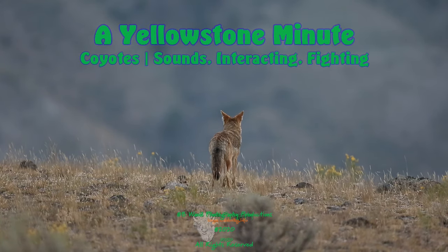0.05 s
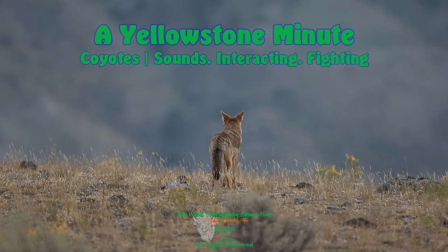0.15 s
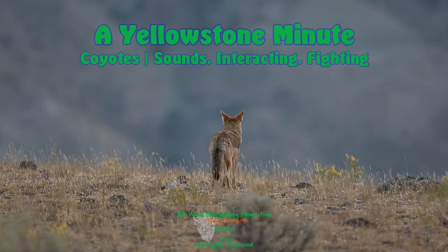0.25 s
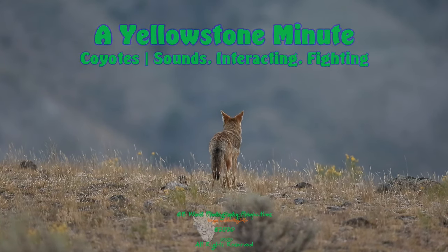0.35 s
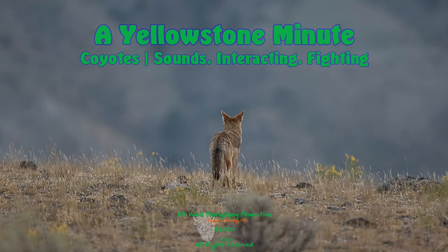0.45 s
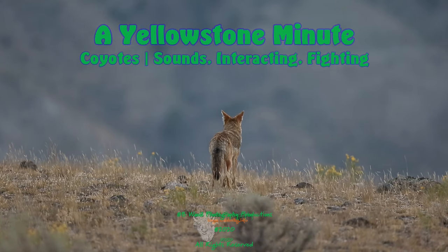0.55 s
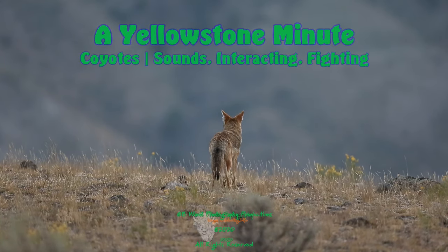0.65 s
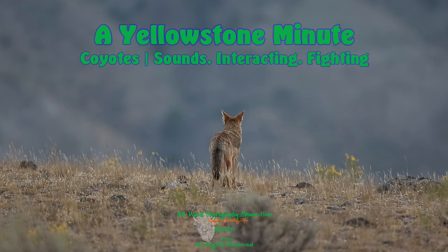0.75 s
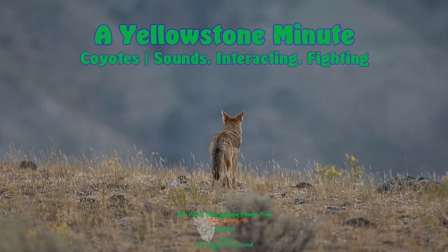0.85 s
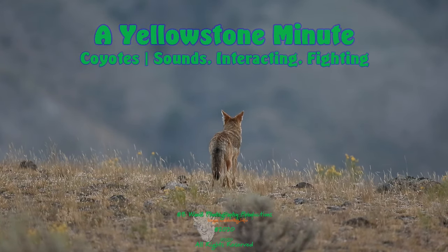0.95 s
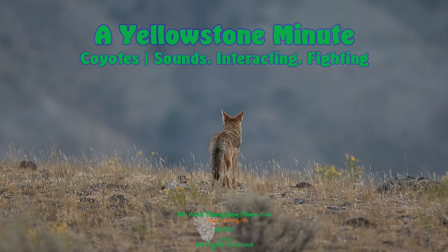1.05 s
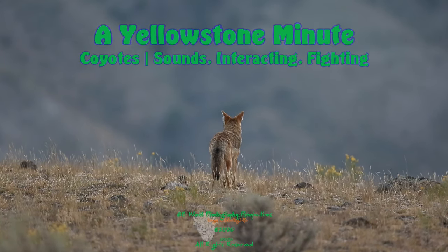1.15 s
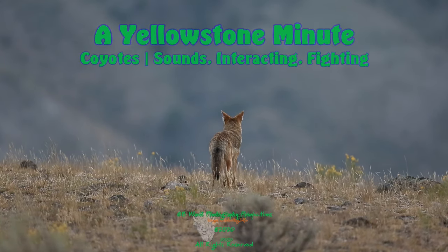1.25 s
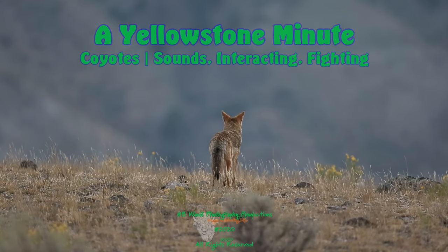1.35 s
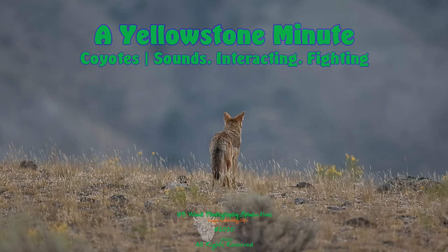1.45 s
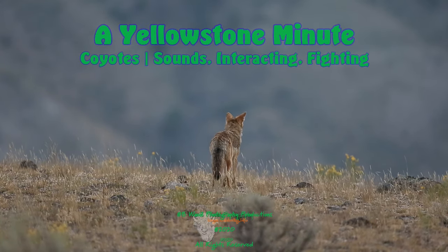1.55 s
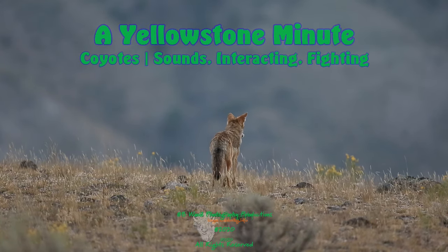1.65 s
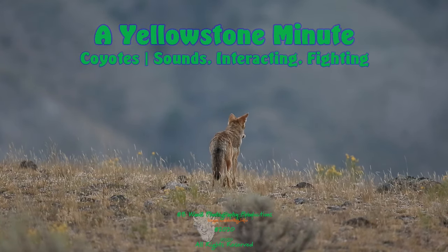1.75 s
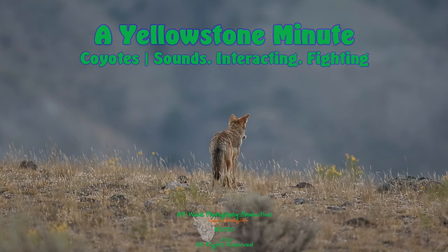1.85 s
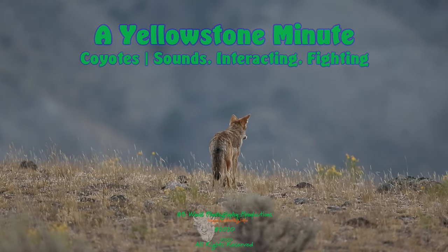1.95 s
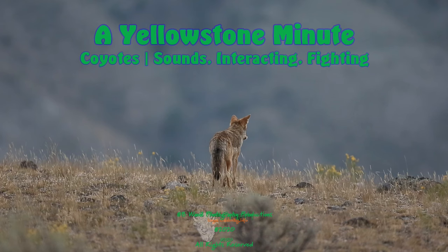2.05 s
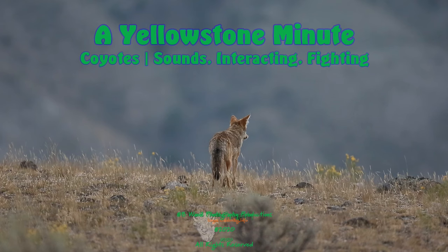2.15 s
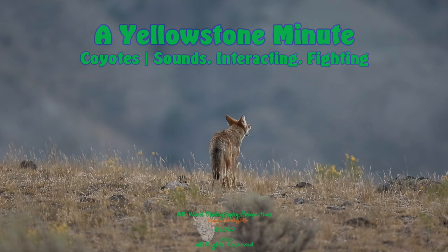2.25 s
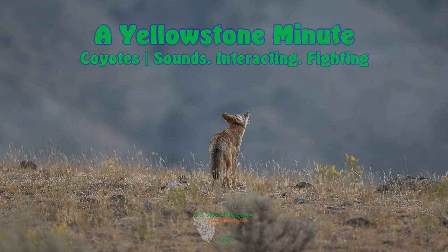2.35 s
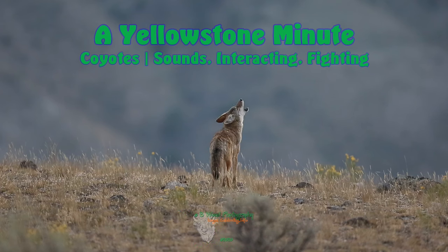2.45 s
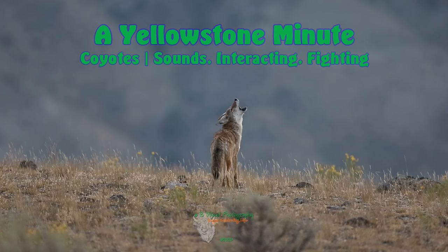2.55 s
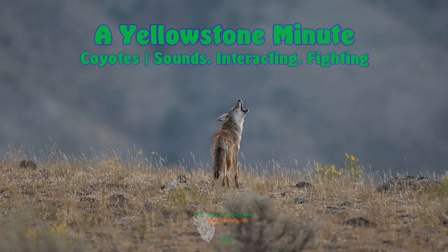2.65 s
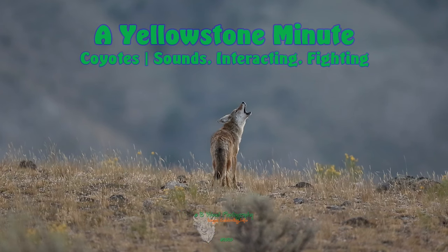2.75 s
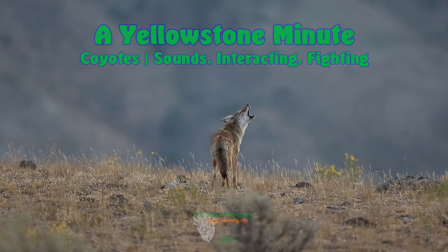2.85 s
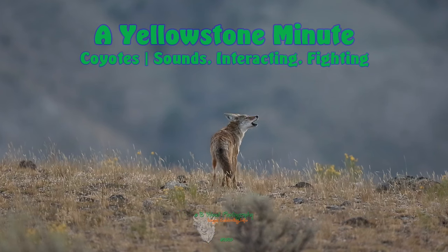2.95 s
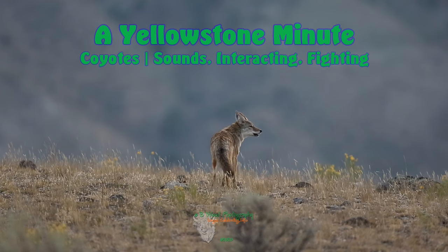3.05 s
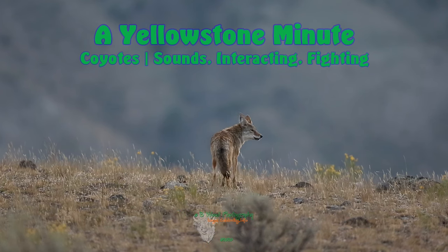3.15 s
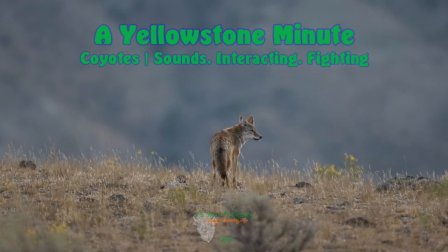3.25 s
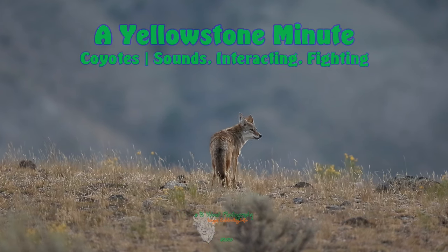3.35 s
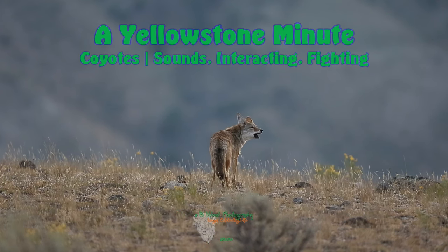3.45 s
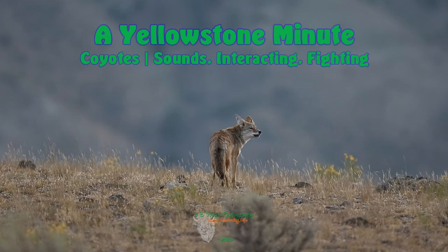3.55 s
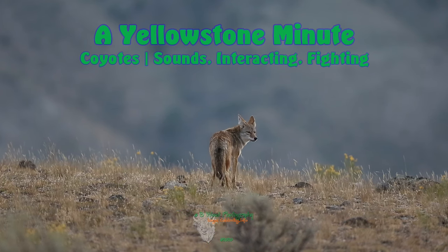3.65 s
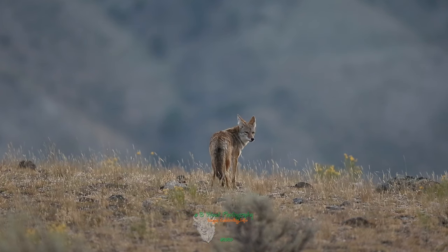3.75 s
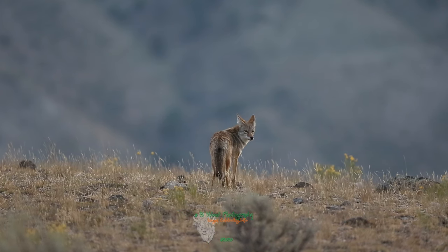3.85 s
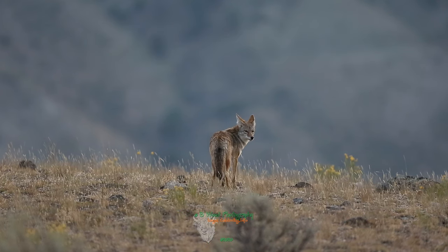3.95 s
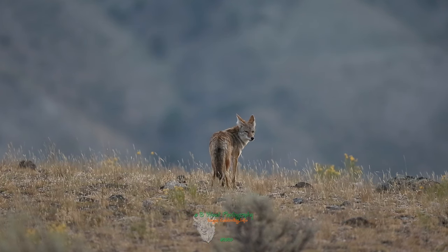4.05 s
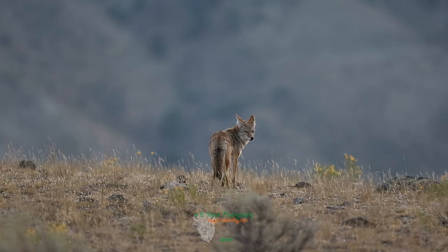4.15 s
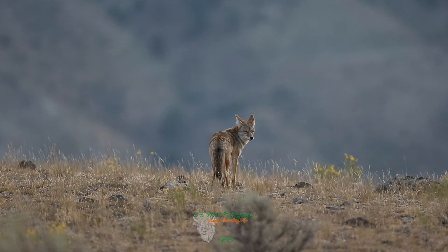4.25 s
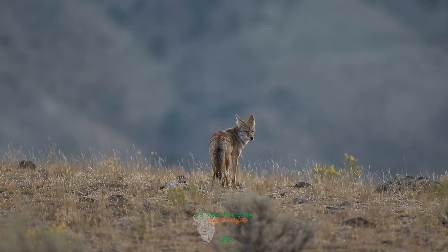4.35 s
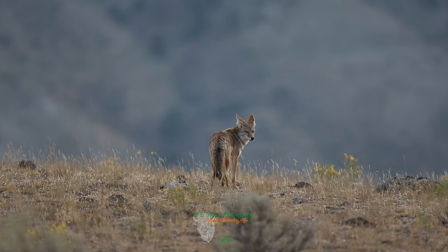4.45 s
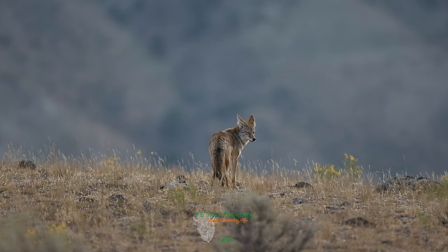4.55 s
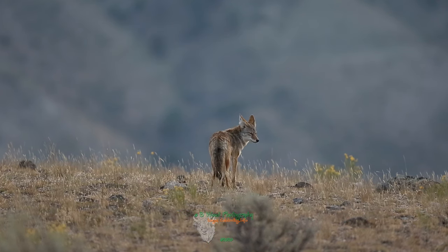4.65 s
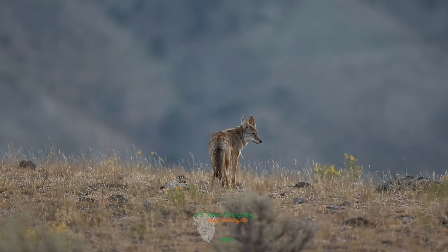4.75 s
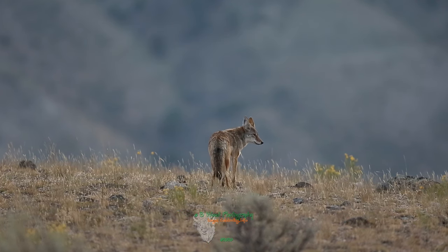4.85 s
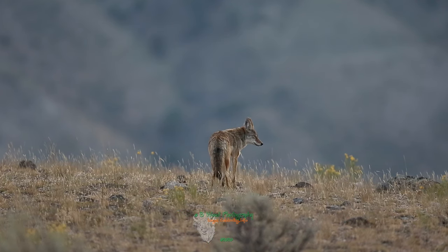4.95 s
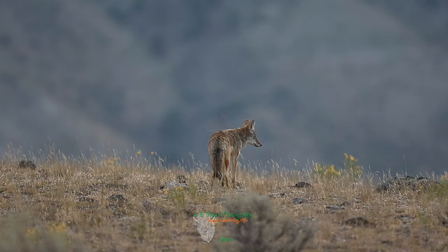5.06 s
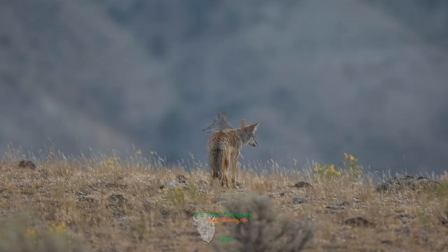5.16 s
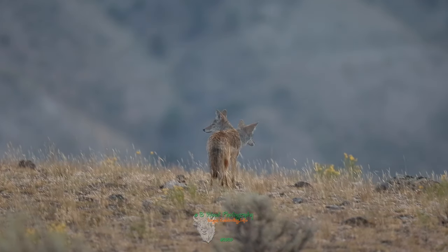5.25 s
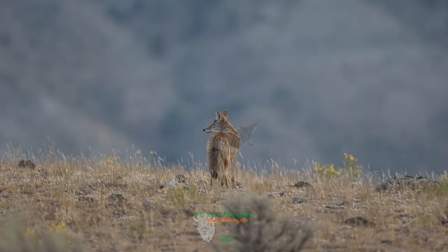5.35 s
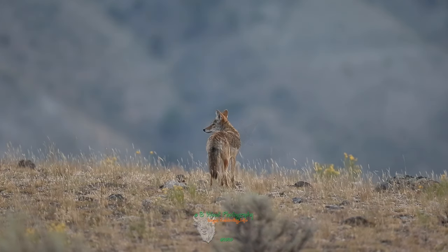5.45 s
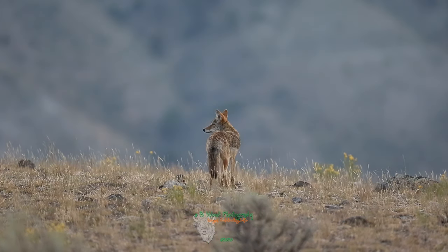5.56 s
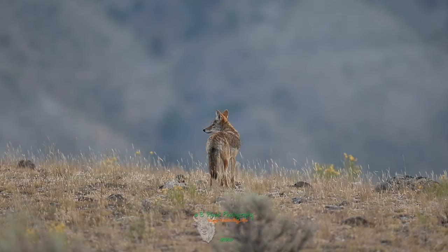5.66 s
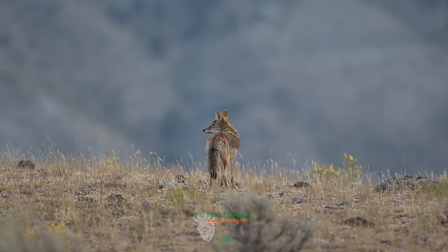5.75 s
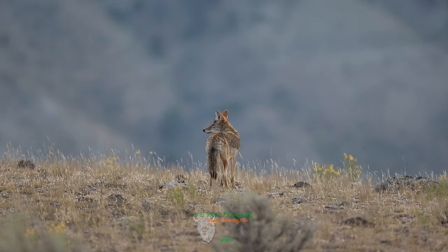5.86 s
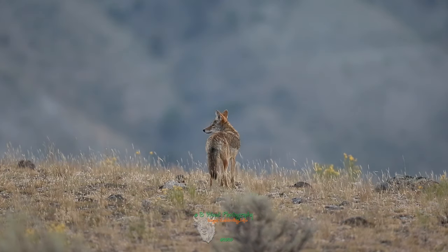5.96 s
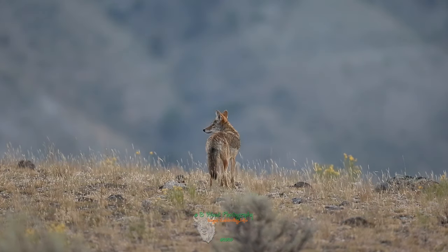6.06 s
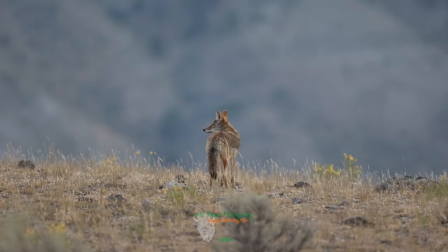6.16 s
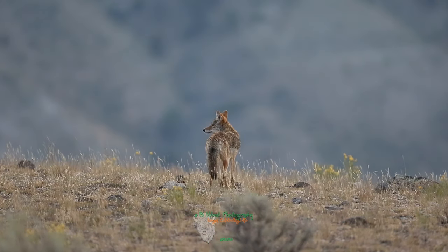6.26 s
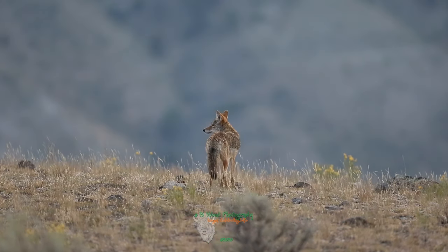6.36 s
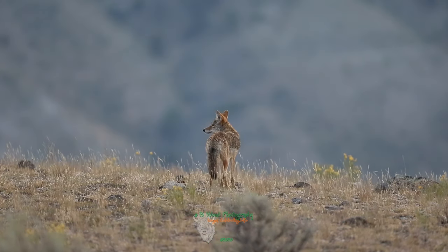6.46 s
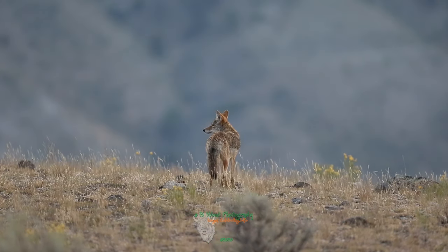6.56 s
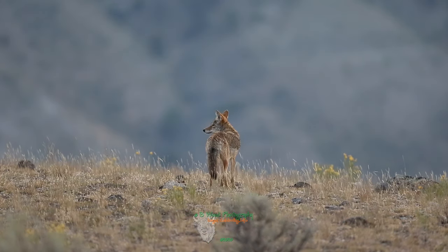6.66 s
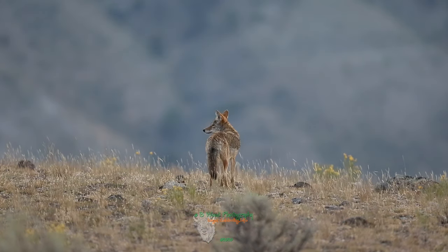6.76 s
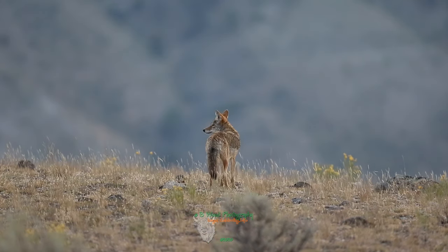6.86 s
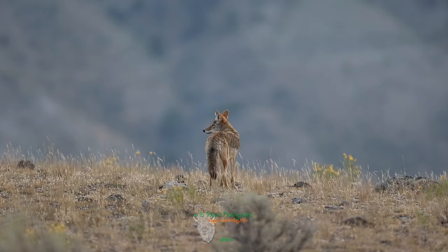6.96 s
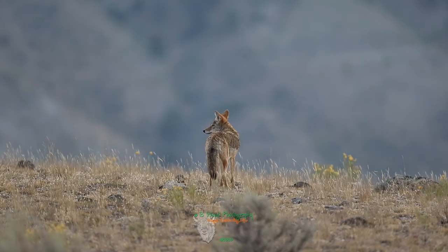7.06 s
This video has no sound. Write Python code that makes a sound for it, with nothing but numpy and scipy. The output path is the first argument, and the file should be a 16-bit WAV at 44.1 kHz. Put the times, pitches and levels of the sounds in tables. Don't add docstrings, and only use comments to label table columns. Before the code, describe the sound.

A coyote yips, howls once high and wavering, then barks on an open hillside, amid constant raspy bird squawks and a few fluttering croaks.

```python
import sys
import numpy as np
from scipy import signal
from scipy.fft import rfft, irfft, next_fast_len
from scipy.io import wavfile
from scipy.ndimage import uniform_filter1d

SR = 44100
rng = np.random.default_rng(int(sys.argv[2]) if len(sys.argv) > 2 else 0)


def volts(x):
    e = np.asarray(x, float) / 20
    return 10 ** e


def transcribe(u):
    v = np.clip(np.atleast_2d(u).T, -1, 1)
    q = np.round(v * 32767).astype(np.int16)
    wavfile.write(sys.argv[1], SR, q)


N = 313110


def evened(x):
    return x / np.sqrt(np.mean(x ** 2) + 1e-20)


def read(points, hz):
    f, value = np.transpose(points)
    return np.interp(np.log(hz + 1), np.log(f + 1), value)


def add(mix, s, sound):
    part = mix[round(s * SR):][:len(sound)]
    part += sound[:len(part)]


def coloured(x, points):
    size = next_fast_len(len(x) + 1024)
    gain = volts(read(points, np.fft.rfftfreq(size, 1 / SR)))
    return evened(irfft(rfft(x, size) * gain, size)[:len(x)])


def air():
    # hz, level_db (per Hz)
    air_spectrum = [(20, -29), (70, -9), (140, -8), (260, -2), (800, -2.5), (1500, -8.5), (3000, -11.5),
                    (6000, -14.5), (10000, -16), (15000, -14.5)]
    # start_s, level_db, length_s
    wind_puffs = [(.0, -76, .06), (0.319, -57.5, 0.063), (0.383, -64, 0.11), (1.75, -72, 0.13),
                  (5.007, -64, 0.06), (5.898, -73, 0.12), (6.816, -67, 0.067)]
    puff_spectrum = [(15, -13), (55, -12), (110, -10.5), (200, -38.5)]  # hz, level_db
    wash_db = -58
    cricket_hz, cricket_width_hz, cricket_db = 7980, 71, -79.5

    frames, hz = N // 256 + 5, np.fft.rfftfreq(1024, 1 / SR)
    real, imaginary, patches = rng.standard_normal((frames, 513, 3)).T
    patches = uniform_filter1d(patches, size=10, axis=0)
    patches = evened(uniform_filter1d(patches, size=16, axis=1))
    cells = (real + 1j * imaginary) * volts(read(air_spectrum, hz)[:, None] + 2.0 * patches)
    wash = signal.istft(cells, nperseg=1024, noverlap=768)[1][:N]
    wash = volts(wash_db - 3.0) * evened(wash)
    for s, level_db, length in wind_puffs:
        size = round(length * SR)
        puff = np.hanning(size) * coloured(rng.standard_normal(size), puff_spectrum)
        add(wash, s, volts(level_db) * puff)
    low_hz, high_hz = cricket_hz - cricket_width_hz, cricket_hz + cricket_width_hz
    line = coloured(rng.standard_normal(N), [(low_hz, -40), (cricket_hz, 0), (high_hz, -40)])
    return wash + volts(cricket_db) * line


def valley(x, t60=1.0, first_s=0.1, slope_s=0.43, slope_db=6, dull_hz=1900):
    t = np.arange(SR) / SR
    taps = rng.standard_normal(SR) * (rng.random(SR) < .05) * (t > first_s)
    answer_db = slope_db * np.exp(-((t - slope_s) / 0.055) ** 2)
    tail = taps * volts(-60 * t / t60 + answer_db)
    dull = signal.lfilter(*signal.butter(2, dull_hz, fs=SR), x)
    return signal.fftconvolve(dull, tail / np.linalg.norm(tail))[:N]


def coo(s, level_db, length, hz):
    size = round(length * SR)
    fuzz = coloured(rng.standard_normal(size), [(0.63 * hz, -30), (hz, 0), (1.7 * hz, -30)])
    return s, volts(level_db) * signal.windows.tukey(size, .6) * fuzz


def far_coos(mix):
    # start_s, level_db, length_s, pitch_hz
    coos = [(1.704, -64.5, 0.19, 292), (2.1, -76, .2, 524), (4.598, -69.5, 0.167, 810),
            (5.886, -50.5, 0.051, 460), (5.85, -51.5, 0.41, 900), (6.049, -50, 0.066, 425),
            (6.13, -58, .07, 402)]
    for row in coos:
        add(mix, *coo(*row))


def rustle(s, peak_db, length, thump_db):
    # hz, level_db
    feather = [(100, -50), (300, -54), (1000, -3), (1800, 3), (3000, -0.5), (4500, -7.5), (6000, -8.5),
               (8000, -1.5), (9500, -15.5), (11500, -18.5), (15000, -31)]
    # hz, level_db
    thump = [(60, -55), (120, -21), (300, -1), (800, 1), (1300, -5.5), (2200, -3), (4000, -63)]
    snaps_per_s = 1300
    u = np.arange(0, length, 1 / SR) / length
    pick, noise = rng.random(len(u)), rng.standard_normal(len(u))
    grains = noise * (.3 + (pick < snaps_per_s / SR))
    snaps = np.pad(grains * np.minimum(u / 0.043, 1) * (1 - u ** 2), 200)
    sound = coloured(snaps, feather) + volts(thump_db) * coloured(snaps, thump)
    return s - 200 / SR, volts(peak_db) * sound


def knocks(mix):
    # start_s, peak_db, length_s, thump_db
    knock_rows = [(3.281, -51.5, .017, -31), (3.905, -54, 0.0064, 6.5), (4.407, -49.5, 0.037, 1),
                  (4.845, -55, 0.007, 2), (4.853, -50.5, 0.0164, 11.5), (4.892, -55, 0.019, 1.5),
                  (5.253, -46.5, 0.014, -22), (5.646, -47.5, 0.015, -11), (5.972, -41.5, 0.027, -16),
                  (6.138, -42.5, 0.043, -23), (6.983, -68.5, .013, 2), (7.048, -69, 0.0034, -5)]
    for row in knock_rows:
        add(mix, *rustle(*row))


def wings(mix):
    # start_s, peak_db
    wing_beats = [(6.308, -51.5), (6.324, -51.5), (6.355, -55.5), (6.38, -50.5), (6.395, -49.5),
                  (6.436, -50), (6.463, -58), (6.492, -52.5), (6.512, -49.5), (6.556, -51), (6.61, -49),
                  (6.631, -50), (6.659, -51.5)]
    for s, peak_db in wing_beats:
        add(mix, *rustle(s, peak_db, length=0.017, thump_db=-11.5))


def folds(hz, rough, jitter, count, body, favoured_db=0):
    shake, breath = rng.standard_normal((2, len(hz)))
    turns = np.cumsum(hz * (1 + jitter * evened(uniform_filter1d(shake, size=90)))) / SR
    k = np.arange(1, count + 1)[:, None]
    partials = np.cos(2 * np.pi * k * turns + k ** 2 / 2)
    pulses = (volts(favoured_db) * partials).sum(0)
    puffs = (0.14 + np.exp(-(turns % 1) / 0.43)) * breath
    rough = np.clip(rough, 0, 1)
    return np.sqrt(1 - rough ** 2) * coloured(pulses, body) + rough * coloured(puffs, body)


def croak(s, length, level_db, top_hz, breath, flutter_per_s):
    # hz, level_db
    crop = [(150, -64), (300, -21), (550, -20.5), (850, -12), (1120, -4), (1650, -7), (2250, -23),
            (2800, -11), (3500, -20.5), (4500, -16), (5300, -23), (8000, -24), (11000, -40.5)]
    u = np.arange(0, length, 1 / SR) / length
    hz = top_hz * np.interp(u, [0, .25, .75, .88, 1], [.88, 0.94, 0.98, 0.96, 0.64])
    phase = (flutter_per_s * length * (u - .1 * u ** 2)) % 1
    flap = np.minimum(phase / 0.073, 1) * np.clip(1.7 - 2.16 * phase, 0, 1)
    chop = 0.093 + .5 * u ** 4 + flap
    swell_db = np.interp(u, [0, .05, .5, .88, 1], [-13, -2.5, 0.5, -0.5, -8])
    voice = folds(hz, breath, jitter=.011, count=16, body=crop)
    return s, volts(level_db + swell_db) * evened(chop) * voice


def raven(mix):
    # start_s, length_s, level_db, top_pitch_hz, breath_share (0-1)
    croaks = [
        (2.954, .205, -45.5, 591.6, 0.24),
        (4.116, .205, -47.5, 581.5, 0.5),
        (5.137, .085, -50, 549, 0.62),
        (5.451, .205, -44.5, 584.6, 0.63),
    ]
    harsh_croaks = [
        (2.378, .145, -42.5, 544.3, 0.8),
    ]
    for rows, flutter_per_s in ((harsh_croaks, 110), (croaks, 72)):
        for row in rows:
            add(mix, *croak(*row, flutter_per_s))


def rasp(s, length, level_db, start_hz, end_hz, treble_db):
    windpipe = [-6.5, -10, -3.5, -0.5, -16.5, -2.5]
    slack_shift = [-1, 3.5, -6.5, -1, 4, -2]
    # hz, level_db
    beak_low = [(200, -65), (500, -29.5), (900, -17), (1500, -4), (1900, -4), (2900, -1), (3250, -14.5),
                (3700, -25.5), (4500, -55)]
    # hz, level_db
    beak_far = [(2000, -70), (3200, -27), (4500, -13.5), (5050, -3.5), (5850, -4), (6600, -12.5),
                (8000, -11), (9500, -21), (12000, -29.5), (15000, -54)]
    # hz, level_db
    beak_near = [(2000, -70), (3000, -18.5), (3750, -10), (4850, 1), (6000, -6.5), (7200, -13), (7950, -6),
                 (9500, -20), (11500, -26), (15000, -55.5)]

    u = np.arange(0, length, 1 / SR) / length
    near = treble_db > -2
    slack = np.clip((590 - start_hz) / 110, 0, 1)
    rise = np.minimum(u, 1.76 - u) ** (1.9 + .6 * slack + .5 * near)
    hz = start_hz + (end_hz - start_hz) * rise
    rough = np.interp(u, [0, .12, .4, .62, .88, 1],
                      [.85, .4 + .52 * slack, .3 + .58 * slack, .28 + .1 * slack, .35, .75])
    tuning = np.interp(u, [0, .35, .75, 1], [0.11, 0.72, 0.9, 0.11])
    quirk_db = 2.5 * rng.standard_normal((6, 1))
    favoured_db = np.outer(np.array(windpipe) + slack * np.array(slack_shift), tuning) + quirk_db
    beak = [(f * (1 + 0.083 * near), db) for f, db in beak_low]
    low = folds(hz, rough, jitter=.008, count=6, body=beak, favoured_db=favoured_db)
    treble_body = beak_near if near else beak_far
    high = folds(hz, 0.51 + 0.37 * slack, jitter=.006, count=18, body=treble_body)
    swell_db = np.interp(u, [0, .09, .4, .72, .905, 1],
                         [-22, -3 - 2.0 * slack - 4.9 * near, -2.5 - 3.53 * near,
                          0.88 + 1.4 * near, -3.5, -20])
    late_db = np.interp(u, [0, .3, .7, 1], [-10.5, -2.0, 0.5, -4.5])
    return s, volts(level_db + swell_db) * (low + volts(treble_db + late_db) * high)


def magpies(mix):
    # start_s, length_s, level_db, end_pitch_hz
    bright_bird = [(0.001, 0.053, -44, 995), (0.073, .11, -44, 962), (0.324, .115, -43.5, 887),
                   (1.002, .104, -47, 971), (1.143, 0.11, -45, 927), (1.312, 0.092, -45.5, 934),
                   (1.627, .13, -42.5, 985), (1.793, .11, -42.5, 913), (2.6, .11, -40.5, 857),
                   (3.022, .11, -47, 863)]
    hoarse_bird = [(0.151, .11, -45.5, 893), (0.386, 0.099, -46.5, 897), (1.445, .147, -50, 825),
                   (1.88, .12, -48.5, 928), (2.073, .13, -50, 870), (3.217, 0.15, -47.5, 960),
                   (3.437, .13, -48.5, 976), (4.498, .14, -46.5, 805), (4.662, .15, -45.5, 904),
                   (4.822, .125, -46, 834), (4.875, .11, -43, 1006), (5.049, 0.11, -45.5, 840),
                   (5.358, .14, -43, 828), (5.648, .15, -39.5, 996)]
    far_bird = [(2.781, 0.13, -42.5, 879), (3.659, .11, -45.5, 963), (3.861, 0.15, -46, 940),
                (4.088, 0.14, -45.5, 885), (4.3, .13, -44.5, 869), (5.011, 0.12, -45, 793)]
    passing_bird = [(5.249, 0.16, -48.5, 726), (5.494, 0.14, -44, 920), (6.35, .11, -47, 990),
                    (6.486, .13, -45.5, 979)]
    near_bird = [
        (5.845, .13, -32.5, 1038),
        (6.007, .13, -30, 1088),
        (6.177, .12, -31, 1048),
    ]
    # rasps, start_pitch_hz, treble_db (over the low band)
    voices = [(bright_bird, 560, -7.5), (hoarse_bird, 455, -11.5), (far_bird, 515, -16.5),
              (passing_bird, 550, -5), (near_bird, 455, 0.84)]
    for rows, start_hz, treble_db in voices:
        for s, length, level_db, end_hz in rows:
            add(mix, *rasp(s, length, level_db, start_hz, end_hz, treble_db))


def bark(rows):
    # hz, level_db
    throat = [(100, -42), (300, -22.5), (500, -10.5), (800, 1.5), (1300, -4), (1700, -5), (2650, -5),
              (3150, -22.5), (3600, -16), (4500, -41), (5600, -25.5), (10000, -44.5)]
    s, *columns = np.transpose(rows)
    t = np.arange(s[0], s[-1], 1 / SR)
    hz, effort_db, rough = (np.interp(t, s, c) for c in columns)
    tilt_db = -3. * np.arange(10)[:, None]
    voice = folds(hz, rough, jitter=0.022, count=10, body=throat, favoured_db=tilt_db)
    return s[0], volts(effort_db) * voice


def howl():
    # time_s, pitch_hz, level_db, second_partial_db
    climb = [(2.525, 666, -34.5, 5), (2.55, 736.2, -24.5, -25.5), (2.574, 968, -39.5, 8.5),
             (2.6, 1057, -28, -5.5), (2.637, 1050, -32.5, -10.5)]
    hold = [(2.655, 1237, -26, -3.5), (2.691, 1292, -19.5, -6), (2.768, 1372, -22, 0.5),
            (2.811, 1359, -23, 0.5), (2.86, 1407, -17.5, -9), (2.898, 1416, -20, -5.5),
            (2.95, 1379, -23.5, -3), (3.0, 1418, -20.5, -7.5), (3.055, 1443, -25.5, 0.5)]
    # from_s, to_s, half_line_db
    doubling = [
        (2.535, 2.618, -10.5),
        (2.682, 2.769, -9.5),
    ]
    # multiple, level_db
    upper = [(3, -31), (4, -29.5), (5, -36.5), (6, -47.5), (7, -49.5), (8, -50.5)]
    # multiple, level_db
    halves = [(.5, -25), (1.5, -1), (2.5, -16), (3.5, -37), (4.5, -31), (5.5, -22.5)]
    drop_s, drop_width_s, drop_share, drop_db, end_s = 3.079, 0.0045, .45, -23, 3.1
    even_db = -49.5

    s, *columns = np.transpose(climb + hold)
    t = np.arange(s[0], end_s, 1 / SR)
    hz, level_db, second_db = (np.interp(t, s, c) for c in columns)
    drop = 1 / (1 + np.exp((drop_s - t) / drop_width_s))
    hz = hz * (1 - drop_share * drop)
    level_db = level_db + drop_db * drop
    second_db = second_db + drop_db * drop ** 2
    half_db = even_db + sum((db - even_db) * ((t >= a) & (t < b)) for a, b, db in doubling)
    half_db = uniform_filter1d(half_db, size=900)
    hz, level_db, second_db, half_db = uniform_filter1d([hz, level_db, second_db, half_db], size=300)
    angle = 2 * np.pi * np.cumsum(hz) / SR
    voice = np.sin(angle) + volts(second_db) * np.cos(2 * angle + np.pi / 4)
    for k, db in upper:
        waver = uniform_filter1d(rng.standard_normal(len(t)), size=1800)
        waver = evened(uniform_filter1d(waver, size=1800))
        voice += volts(db + 2.2 * waver - 1.5) * np.sin(k * angle)
    voice += volts(half_db) * sum(volts(db) * np.sin(k * angle) for k, db in halves)
    return s[0], np.sqrt(2) * volts(level_db - 0.76) * voice * signal.windows.tukey(len(t), .04)


def coyote(mix):
    # time_s, pitch_hz, effort_db, roughness (0-1)
    barks = [
        [(2.325, 297.4, -65.5, 0.4), (2.36, 504, -39.5, 0.3), (2.372, 588, -32.5, 0.25),
         (2.405, 872, -35, 0.94), (2.428, 752, -32.5, 0.2), (2.45, 694, -45.5, 0.3)],
        [(2.535, 693.6, -38.5, 0.4), (2.555, 782, -34.5, 0.8), (2.58, 958, -24, 0.3), (2.6, 1038, -33.5, 0.7),
         (2.625, 1077, -44, 0.2)],
        [(3.065, 1286, -59, 0), (3.08, 990, -46.5, 0.5), (3.1, 788, -43, 0.7)],
        [(3.575, 336.4, -63, 0.4), (3.6, 426.7, -45, 0.77), (3.625, 623.6, -30, .8), (3.645, 827, -27.5, 1.11),
         (3.665, 785, -37.5, 0.08), (3.676, 734, -44, 0.1)],
    ]
    add(mix, *howl())
    for rows in barks:
        add(mix, *bark(rows))


def scene():
    coyote_sound, near_life = np.zeros((2, N))
    coyote(coyote_sound)
    for source in (far_coos, knocks, wings, raven, magpies):
        source(near_life)
    brush = valley(near_life, t60=0.17, first_s=.004, slope_db=5, dull_hz=4730)
    echo = volts(-29.5) * valley(coyote_sound)
    return (coyote_sound + echo + near_life + volts(-12.5) * brush + air())[None]


def low_pass(x):
    return signal.sosfilt(signal.butter(12, 16440, fs=SR, output="sos"), x)


def record(dry):
    # hz, gain
    late_share = [(300, 0.5), (5000, 0.62), (9000, 0.55), (14000, 0.24)]
    late_samples, edge_hz = 166.35, 15500
    edit_s, fade_out_s, fade_in_s, fade_bend, full_db = 5.237, .24, 0.18, 1, 3

    push = signal.lfilter(*signal.butter(1, [1.5, 80], "band", fs=SR), dry ** 4)
    bent = dry + 6.5 * push
    size = next_fast_len(N + 1024)
    hz = np.fft.rfftfreq(size, 1 / SR)
    comb = 1 + read(late_share, hz) * np.exp(-2j * np.pi * hz * late_samples / SR)
    doubled = irfft(rfft(bent, size) * comb * (hz < edge_hz), size)[:, :N]
    t = np.arange(N) / SR - edit_s
    ramps = np.maximum(-t / fade_out_s, t / fade_in_s)
    fade = volts(full_db) * np.minimum(ramps, 1) ** fade_bend
    return low_pass(doubled * fade)


dry = scene()
out = record(dry)
transcribe(out)
```